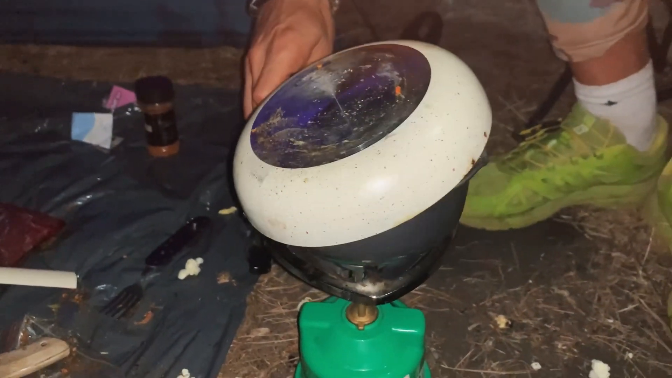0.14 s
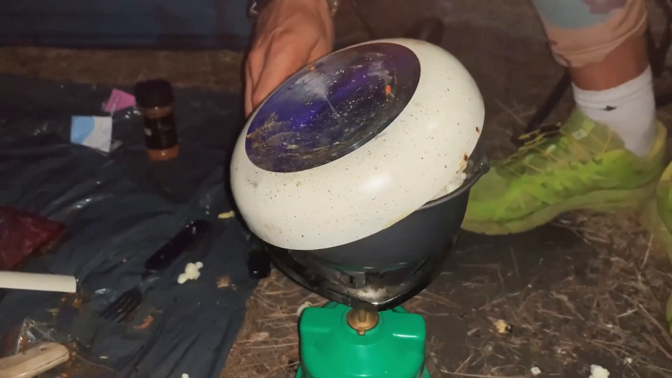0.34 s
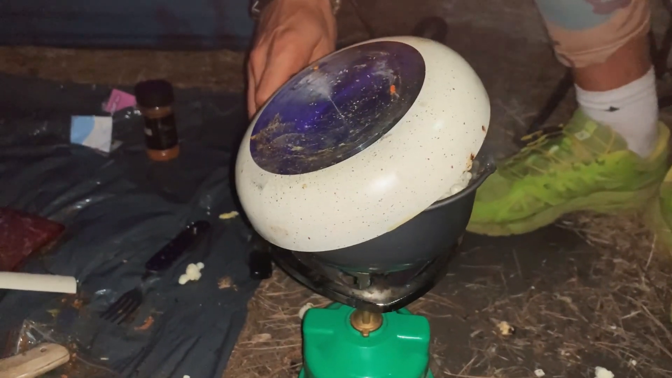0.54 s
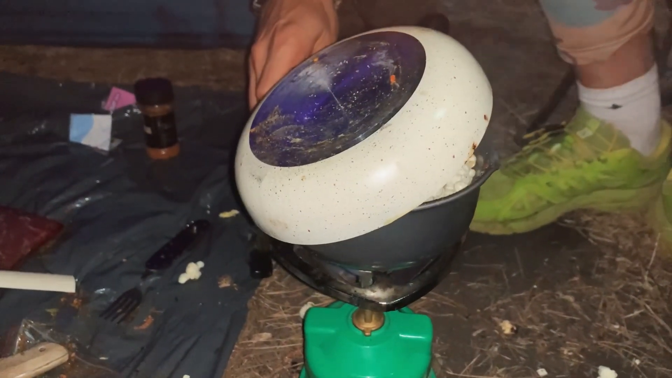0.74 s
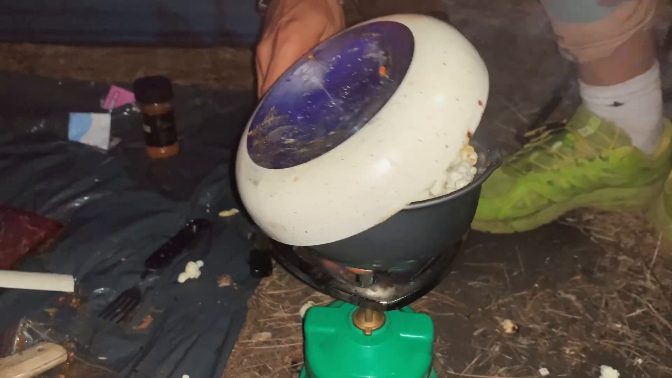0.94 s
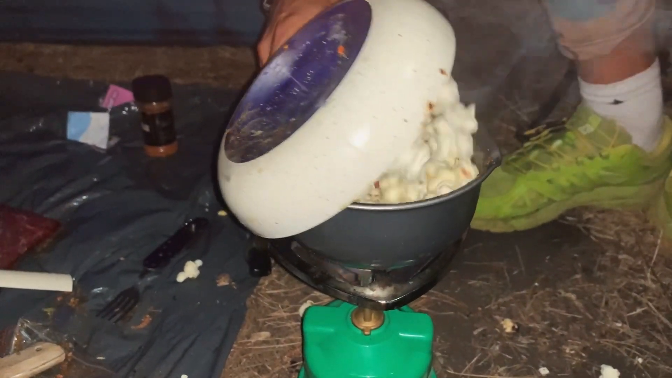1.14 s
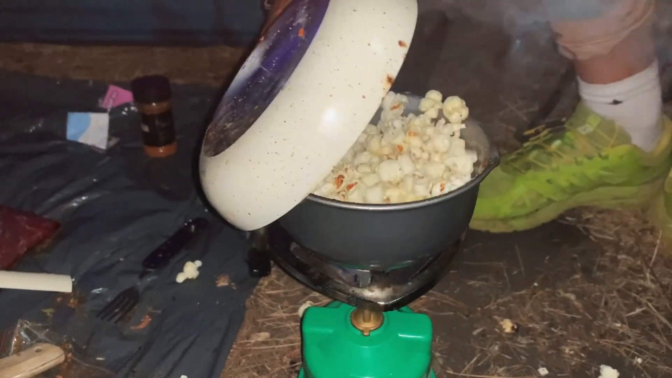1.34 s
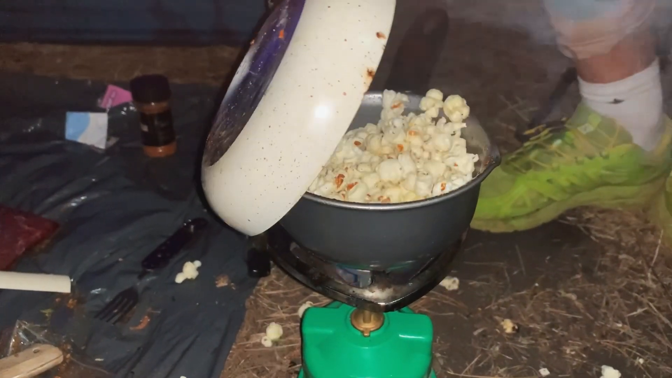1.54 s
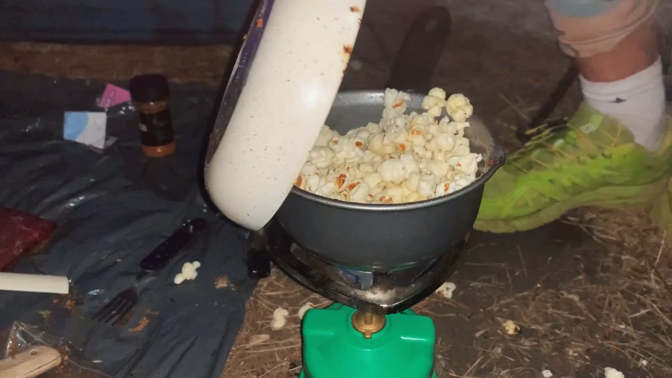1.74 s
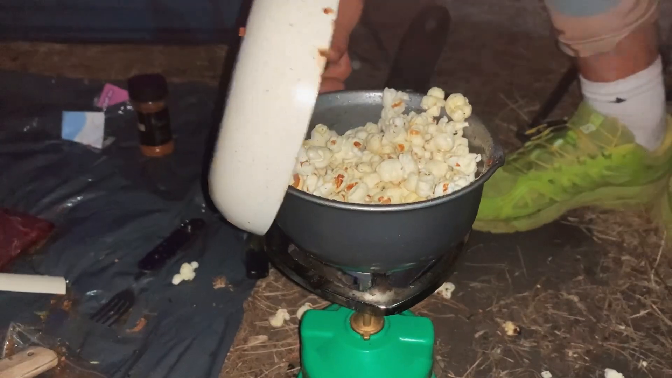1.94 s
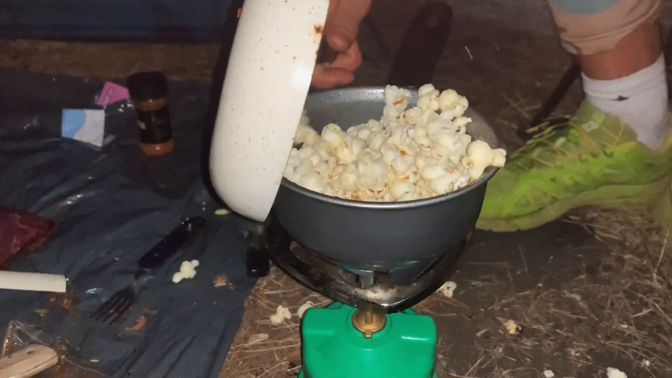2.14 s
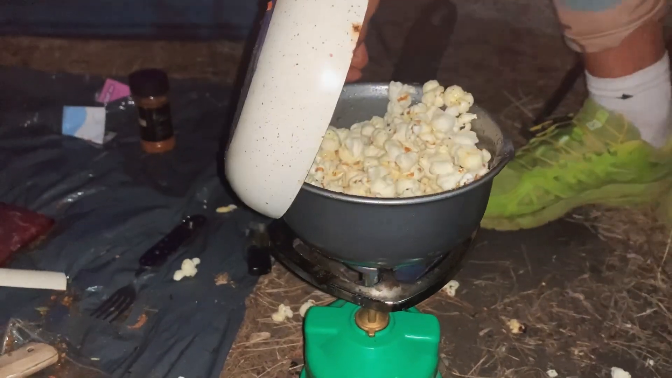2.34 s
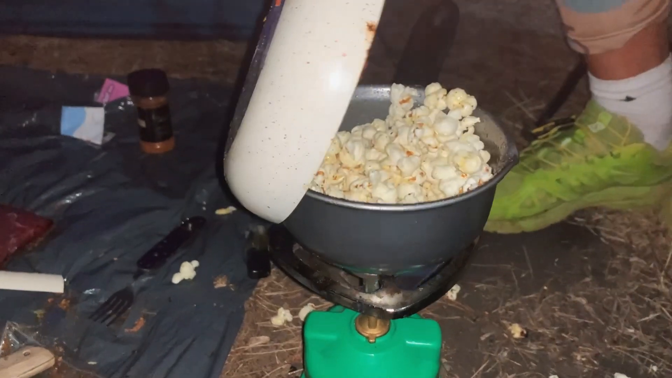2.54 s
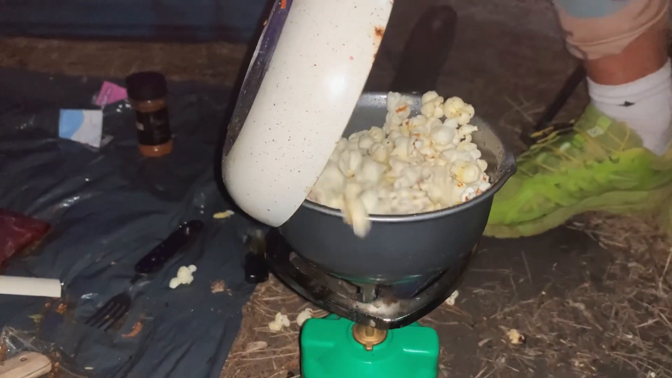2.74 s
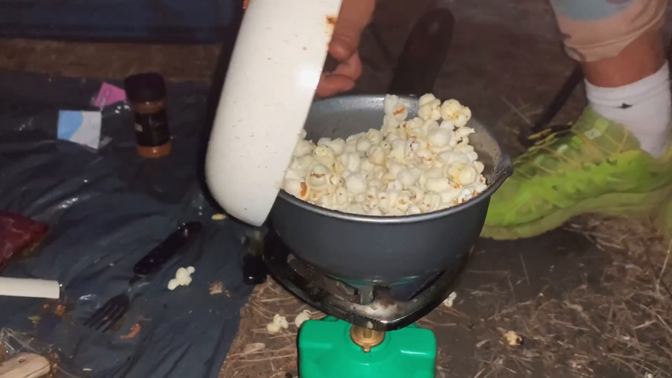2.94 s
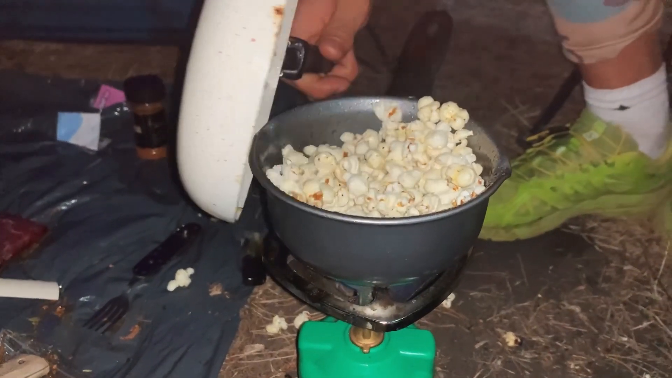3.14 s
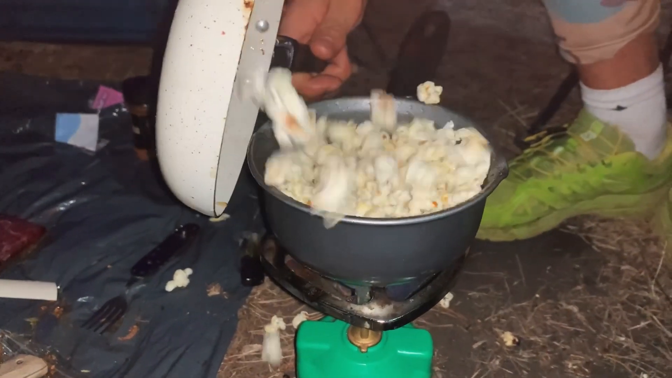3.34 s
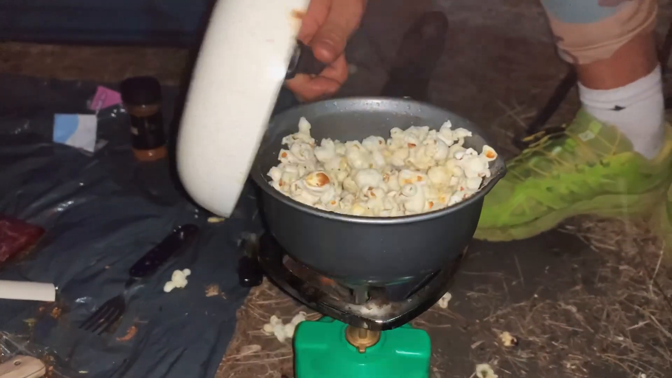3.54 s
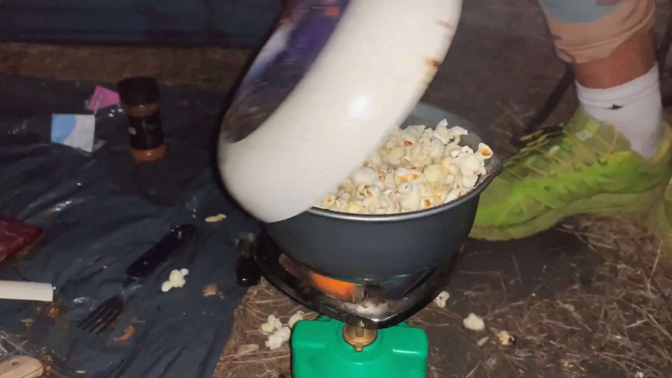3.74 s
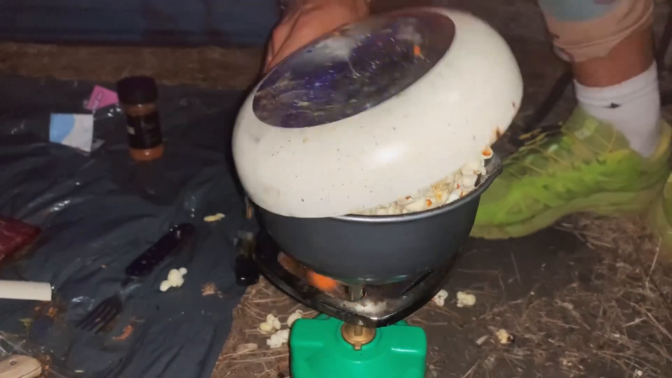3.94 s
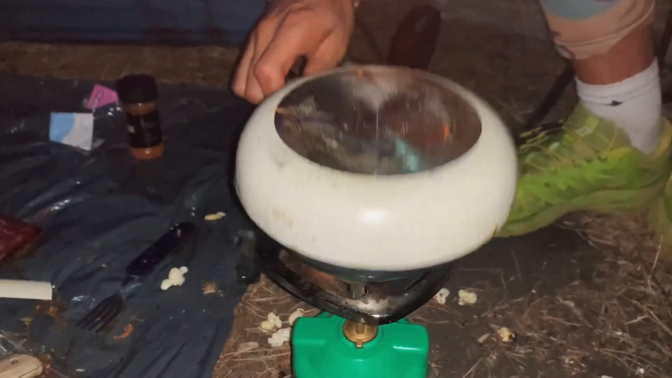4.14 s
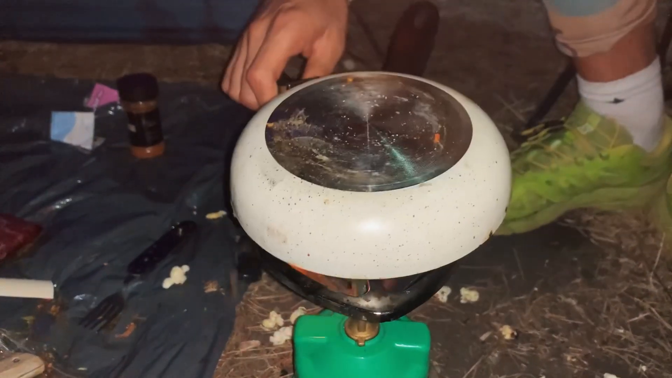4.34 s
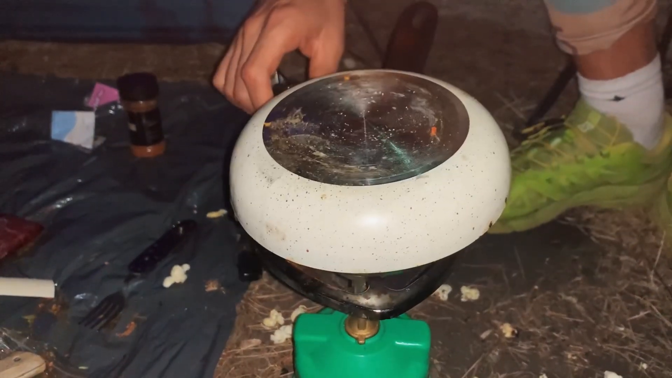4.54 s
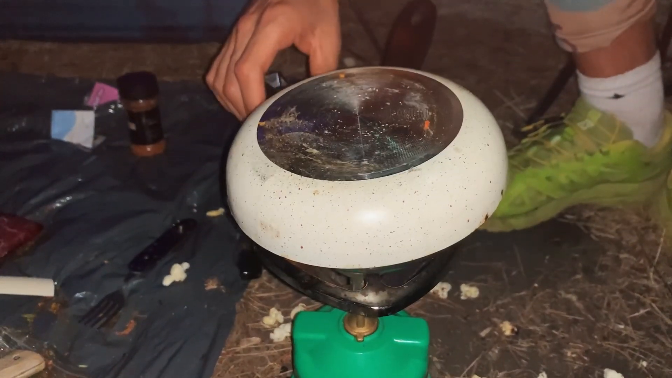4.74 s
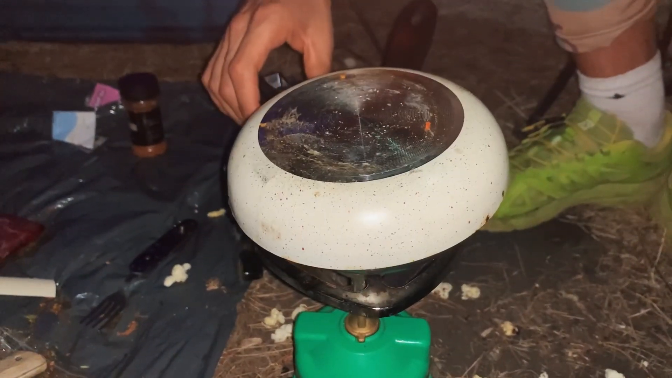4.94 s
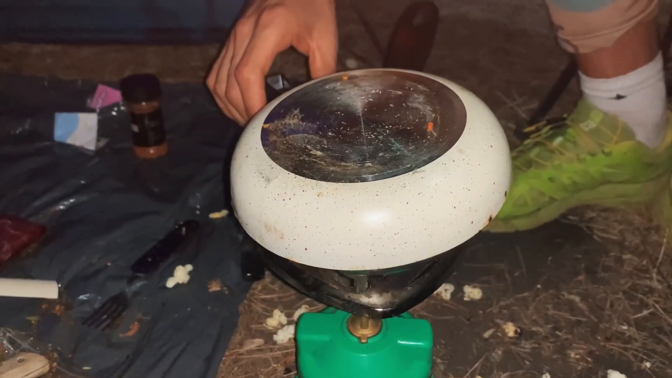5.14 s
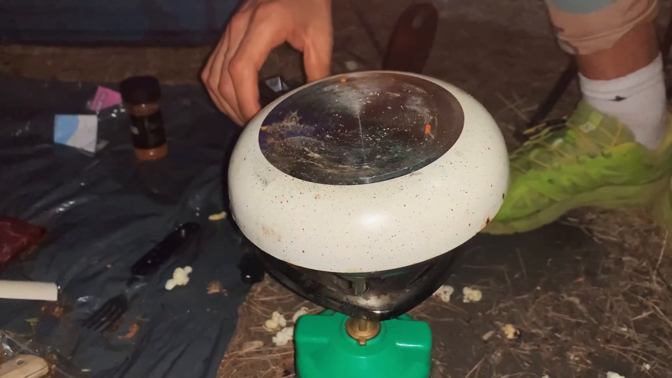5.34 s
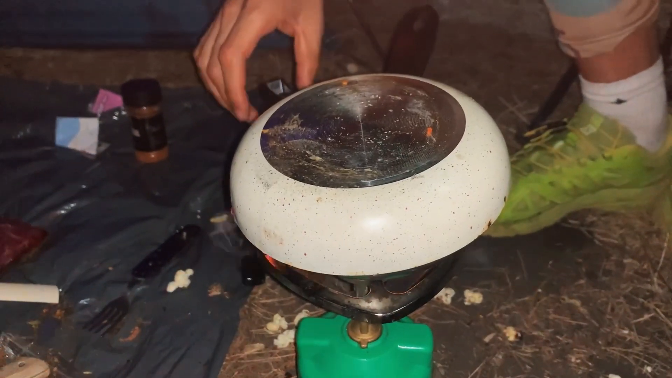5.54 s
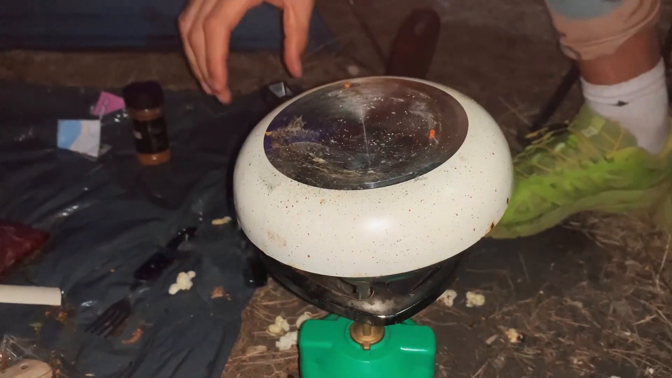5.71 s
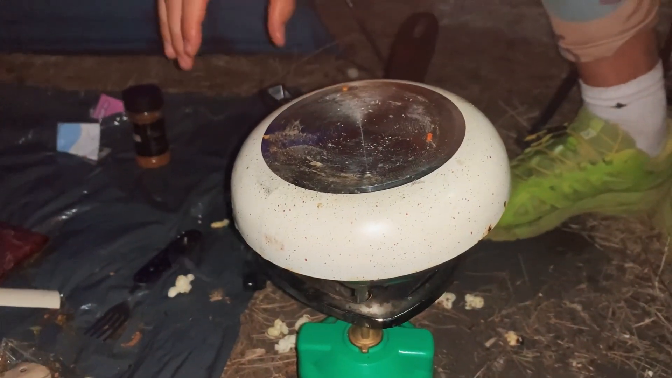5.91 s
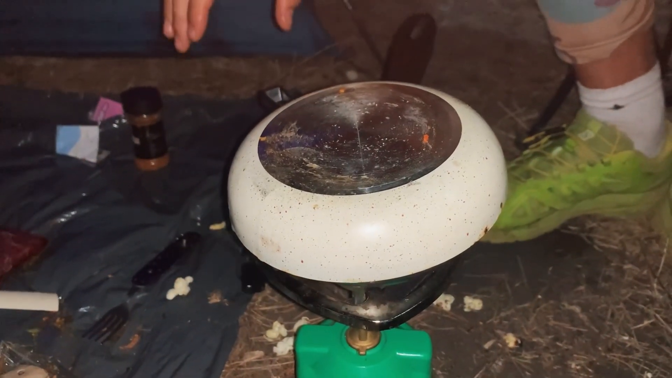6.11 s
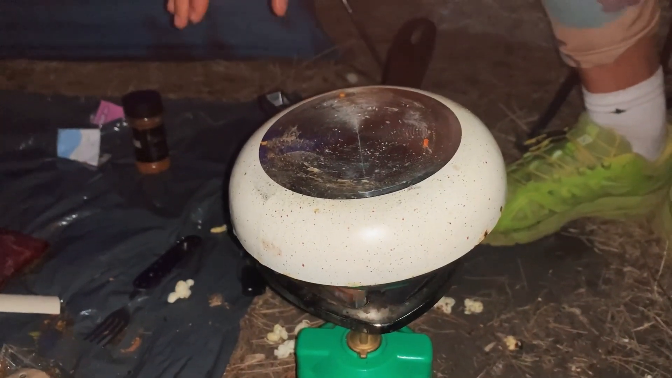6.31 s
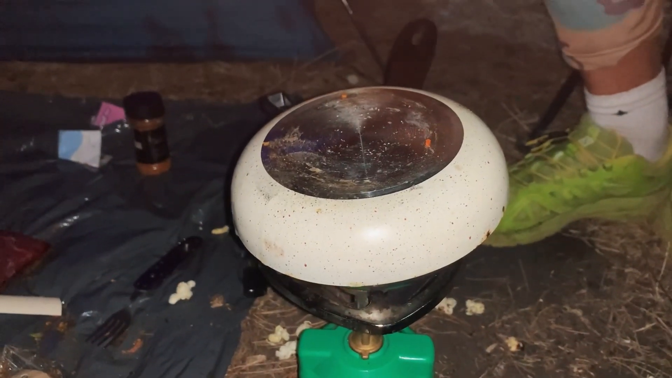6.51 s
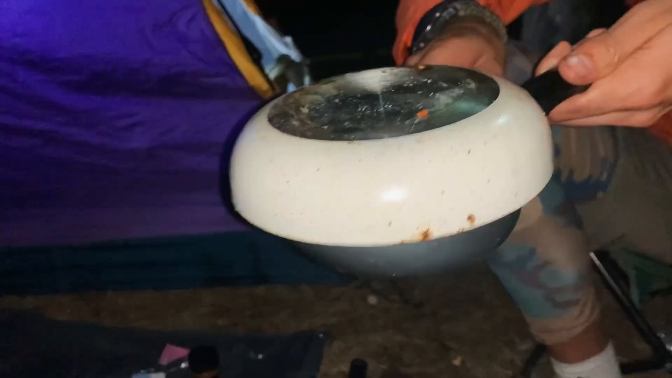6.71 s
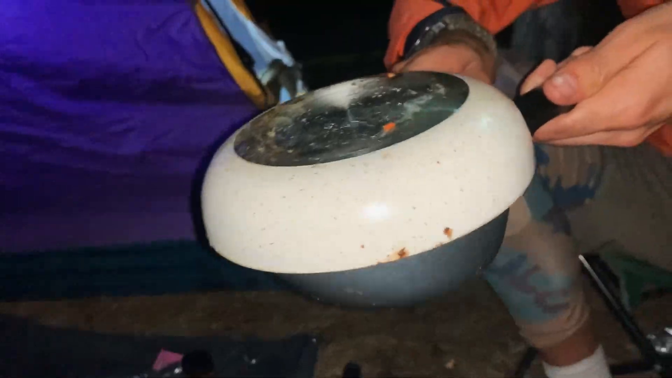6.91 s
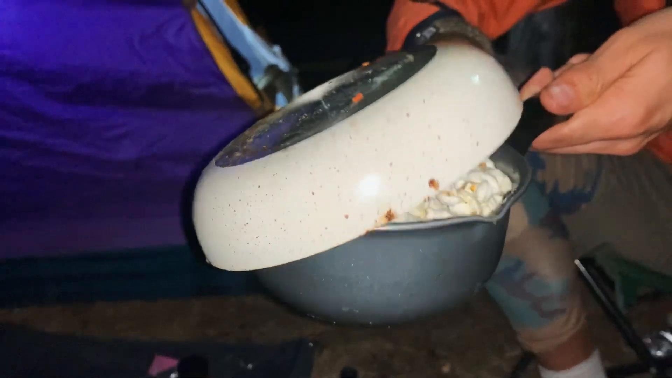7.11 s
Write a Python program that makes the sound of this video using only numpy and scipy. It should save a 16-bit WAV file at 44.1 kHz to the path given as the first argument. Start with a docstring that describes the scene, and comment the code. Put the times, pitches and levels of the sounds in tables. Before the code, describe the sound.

Popcorn snaps and knocks irregularly in a metal pot under a loose bowl lid, over low burner rumble, insect chirps and faint bird whistles, outdoors.

```python
"""Outdoors at night, popcorn bursts in a small metal pot on a gas burner, under an upturned bowl as lid.
The bowl is tilted open, put back and slid off at the end. Each hit is a ragged noise burst with ringing
pot air, a thump, the bowl's modes and a rattling heap. Shaped noise makes the flame's roar, a background hiss
and spitting oil; gliding breathy tones make a far bird, and paired pulses of noise a chirping insect."""
import sys
import numpy as np
from scipy import signal
from scipy.fft import rfft, irfft, next_fast_len
from scipy.io import wavfile
from scipy.ndimage import uniform_filter1d

SR = 44100
rng = np.random.default_rng(int(sys.argv[2]) if len(sys.argv) > 2 else 0)


def generate_wav(signal):
    """Clip the signal to [-1, 1] and save it as 16-bit WAV at the path in sys.argv[1]."""
    frames = np.transpose(np.atleast_2d(signal))
    scaled = np.clip(frames, -1, 1) * 32767
    pcm = np.round(scaled).astype(np.int16)
    wavfile.write(sys.argv[1], SR, pcm)


N = 320590  # samples


def amp(db):
    """Decibels to gain."""
    return 10 ** (np.asarray(db) / 20)


def evened(x, count=None):
    """Scales to rms 1 over the first count samples of the last axis."""
    return x / np.sqrt(np.mean(x[..., :count] ** 2) + 1e-20)


def read(points, hz):
    """A spectrum table read on a log-frequency axis."""
    f, value = np.transpose(points)
    return np.interp(np.log(hz + 1), np.log(f + 1), value)


def track(rows, column=1):
    """One column of a curve at every sample."""
    rows = np.array(rows)
    return np.interp(np.arange(N) / SR, rows[:, 0], rows[:, column])


def add(mix, s, sound):
    """Mixes a sound in at s seconds."""
    part = mix[..., round(s * SR):][..., :sound.shape[-1]]
    part += sound[..., :part.shape[-1]]


def resonate(x, hz, width):
    """A resonance of moving pitch: shifts hz down to zero, smooths, and shifts back."""
    turn = np.exp(2j * np.pi * np.cumsum(hz * np.ones(x.shape[-1])) / SR)
    r = np.exp(-np.pi * width / SR)
    return 2 * (turn * signal.lfilter([1 - r], [1, -r], x / turn)).real


# how alike left and right are, before nearness: (frequency [Hz], likeness [0 to 1])
LIKENESS = [(60, 0.81), (300, 0.98), (700, 0.74), (1500, 0.11), (3000, 0.058), (6800, 0.01), (15000, 0.15)]


def noise(colour, near=0):
    """Two-port noise of rms 1, most alike in the bass; a near point source (1) is more alike."""
    size = next_fast_len(N)
    hz = np.fft.rfftfreq(size, 1 / SR)
    a, b = rfft(rng.standard_normal((2, size)))
    same = np.clip(read(LIKENESS, hz), 0, 1) ** (1 - 0.12 * near)
    pair = np.array([a, same * a + np.sqrt(1 - same ** 2) * b])
    return evened(irfft(pair * amp(read(colour, hz)), size)[:, :N])


def wander(seconds):
    """Smooth chance of rms 1 that changes over the given time."""
    size = max(int(seconds * SR), 1)
    once = uniform_filter1d(rng.standard_normal(N), size)
    return evened(uniform_filter1d(once, size))


def grains(per_s, spread_db, seconds):
    """Envelope of rms 1 made of sparse dying ticks of uneven size."""
    size = amp(spread_db * np.minimum(rng.exponential(1, N), 4))
    ticks = size * (rng.random(N) < per_s / SR)
    return evened(signal.lfilter([1], [1, -np.exp(-1 / (seconds * SR))], ticks))


# background hiss's colour, constant in time: (frequency [Hz], relative level [dB per Hz])
HISS_COLOUR = [(300, 2), (800, -11), (1400, -1.5), (2600, -8.5), (4400, -1.5), (5200, -17.5), (6300, -4.5),
               (7300, -39.5), (8000, 0), (9000, 0.5), (10500, -6.5), (11600, -31.5), (13500, -20),
               (15000, -41.5)]
# background hiss: (time [s], level [dB])
HISS_LEVEL = [(0, -61.5), (1.8, -60), (2.85, -57.5), (3.02, -61.5), (3.55, -56.5), (4.2, -59),
              (4.45, -58.5), (5.2, -62), (5.9, -61), (6.3, -54.5), (6.68, -61.5), (6.85, -70.5)]


def background_hiss():
    """Background hiss, strongest near 8-9 kHz: shaped noise whose level trembles slightly."""
    return amp(track(HISS_LEVEL)) * noise(HISS_COLOUR) * amp(1.0 * wander(0.0033))


# the chirping pace, about ten a second: (time [s], chirps sung so far [count])
CHIRP_COUNT = [(.044, 0), (.548, 5), (.955, 9), (1.475, 14), (2.42, 23), (3.033, 29), (3.65, 35),
               (4.445, 43), (4.84, 47), (5.65, 55), (6.016, 59), (6.716, 66)]
# the insect's level: (time [s], level [dB])
CHIRP_LEVEL = [(0, -58), (2.9, -61.5), (3.1, -75), (3.6, -63), (5.65, -53), (5.8, -78), (6.05, -56.5),
               (6.65, -56.5), (6.76, -59.5)]
# colour of the wing rasp: (frequency [Hz], relative level [dB])
WING_COLOUR = [(7600, -70), (8300, -6), (9050, 0), (9600, -7), (10300, -12.5), (11400, -67)]
STROKE_S, PAIR_GAP_S, SECOND_DB = 0.0032, 0.034, 2.5  # Gaussian sigma; gap and level of the second stroke


def insect():
    """Two short rasping wing strokes per chirp, each a bell-shaped pulse of treble noise."""
    s, sung = np.transpose(CHIRP_COUNT)
    at = np.interp(np.arange(sung[-1] + 1), sung, s)
    size_db = 1.5 * rng.standard_normal((len(at), 2))
    t, strokes = np.arange(-1000, 1000) / SR, np.zeros(N)
    stroke = np.exp(-(t / STROKE_S) ** 2 / 2)
    for centre, (first_db, second_db) in zip(at, size_db):
        add(strokes, centre + t[0], amp(first_db) * stroke)
        add(strokes, centre + PAIR_GAP_S + t[0], amp(second_db + SECOND_DB) * stroke)
    return amp(track(CHIRP_LEVEL)) * strokes * noise(WING_COLOUR, near=0.87)


# far bird's whistles: (start [s], length [s], pitch before scoop and fall [Hz], peak level [dB],
# breath over tone [ratio])
WHISTLES = [(1.266, 0.053, 1396, -52, 3), (1.301, 0.25, 1520, -53.5, 0.44), (1.533, 0.18, 1513, -65, 1.5),
            (3.264, 0.17, 1169, -53, 3.8), (4.39, 0.28, 1542, -53, 0.39)]
SCOOP_HZ, SCOOP_S, WAVER_HZ = 230, 0.018, 8  # slides up from below; waver is rms
FALL_HZ_PER_S = 750  # sinks all along
WHISTLE_PEAK = 0.7  # loudest at this share of the length


def bird():
    """Thin falling whistles, each a gliding sine with narrow breath noise at the same pitch."""
    out = np.zeros((2, N))
    for s, length, top_hz, db, airy in WHISTLES:
        t = np.arange(0, length, 1 / SR)
        glide = top_hz - SCOOP_HZ * np.exp(-t / SCOOP_S) - FALL_HZ_PER_S * t
        hz = glide + WAVER_HZ * wander(0.03)[:len(t)]
        swell_db = np.interp(t / length, [0, WHISTLE_PEAK, 1], [-7, 0, -12])
        phase = np.array([[1.4], [0]])  # left leads by 1.4 radians
        tone = np.sqrt(2) * np.sin(2 * np.pi * np.cumsum(hz) / SR + phase)
        air = rng.standard_normal((2, len(t)))
        breath = evened(resonate(resonate(air, hz, 53), hz, 97))
        whistle = evened(tone + airy * breath)
        add(out, s, amp(db + swell_db) * whistle * signal.windows.tukey(len(t), 0.15))
    return out


# dips of the low roar: (fully down [s], roar starts back [s], flutter starts back [s], depth [dB])
ROAR_DIPS = [(3.051, 3.348, 3.36, -14), (6.814, 7.3, 7.0, -23.5)]
DIP_FALL_S, DIP_RISE_S = 0.11, 0.089


def dips(column):
    """Gain that sinks at each dip and starts back at the time in the given column."""
    depth_db = 0
    for d in ROAR_DIPS:
        down, back, depth = d[0], d[column], d[3]
        curve = [(down - DIP_FALL_S, 0), (down, depth), (back, depth), (back + DIP_RISE_S, 0)]
        depth_db = depth_db + track(curve)
    return amp(depth_db)


# flame roar's colour: (frequency [Hz], relative level [dB per Hz])
ROAR_COLOUR = [(13, -67.5), (22, -41), (43, -9.5), (66, 1.5), (167, -5.5), (281, -21.5), (307, -24.5),
               (422, -34), (509, -53), (700, -64), (910, -90.5), (1540, -120)]
ROAR_DB, FLUTTER_DB = -47.5, -52  # outside the dips


def burner():
    """Lumpy flame roar of bass noise with a narrow flutter near 60 Hz."""
    roar = noise(ROAR_COLOUR) * amp(2.0 * wander(0.024))
    flutter = evened(resonate(rng.standard_normal(N), 62, 4))
    return amp(ROAR_DB) * dips(column=1) * roar + amp(FLUTTER_DB) * dips(column=2) * flutter


# oil spitting and corn rustling in the treble: (time [s], level before the ticks [dB])
SPIT_LEVEL = [(0, -49), (.2, -87), (2.55, -83), (2.75, -62), (3.3, -73.5), (3.45, -53), (3.6, -61.5),
              (3.98, -74), (4.03, -48), (4.14, -59), (4.45, -80.5), (6.0, -87), (6.3, -75), (6.75, -80)]
# colour of the spitting: (frequency [Hz], relative level [dB])
SPIT_COLOUR = [(3000, -29.5), (5000, -10), (6500, -3), (9000, 1), (11000, 1), (11800, -26), (13300, 0.5),
               (15000, -19), (16300, -26.5)]


def spitting():
    """Spitting oil and rustling corn: sparse ticks over a steady bed of treble noise."""
    spits = (0.68 + grains(150, 3.1, 0.0045)) * noise(SPIT_COLOUR)
    return amp(track(SPIT_LEVEL)) * spits


# the bowl's modes: [Hz]
BOWL_HZ = [1160, 1210, 1885, 1960, 2220, 2600, 2738, 3295, 3600, 3984, 4170, 4465, 4750, 5440]
# one row per mode: (relative level [dB], base time to fall 60 dB [s])
BOWL_RING = [(1, 0.12), (-10.5, 0.22), (-1.5, 0.1), (-10.5, 0.15), (-19.5, 0.14), (-10, 0.043), (-14, 0.23),
             (-11.5, 0.13), (-12.5, 0.073), (-2.5, 0.043), (-12, 0.13), (-5, 0.11), (-13, 0.12),
             (-14.5, 0.11)]
RING_SAMPLES = SR // 3


def bowl_ring(share_db=0, lasting=1):
    """The bowl's modes after one tap, quickly damped at first; share_db sets how well each is excited."""
    hz = np.array(BOWL_HZ)[:, None]
    db, t60 = np.transpose(BOWL_RING)[:, :, None]
    t = np.arange(RING_SAMPLES) / SR
    fade = amp(-60 * t / (0.58 * t60)) + amp(-5.0 - 60 * t / (lasting * t60))
    return (amp(db + share_db) * fade * np.sin(2 * np.pi * hz * t)).sum(0)


# corn shuffling, heard mostly while the bowl is moved: (time [s], drive level [dB])
SHUFFLE_LEVEL = [(0, -32), (.14, -65), (.4, -52.5), (.7, -66), (1.3, -61), (1.45, -76.5), (1.95, -76),
                 (2.1, -63.5), (2.8, -60), (3.1, -88), (3.4, -66.5), (3.7, -82), (3.88, -58), (3.95, -51),
                 (4.06, -54), (4.5, -63), (4.65, -55), (4.9, -62.5), (5.0, -110), (5.45, -55),
                 (5.75, -63.5), (5.9, -56), (6.8, -65)]
# the gap under the bowl tunes the pot air and sets how hard corn hits the bowl (slide and hits use it too):
# (time [s], air pitch [Hz], air width [Hz], relative contact [dB], late ring length [factor])
# the ring lasts longer when the bowl is held free
LID = [(0, 740, 190, -15, 5.1), (1.1, 796, 199, -2, 2.4), (1.5, 750, 440, -7.5, 1.7),
       (3.6, 800, 456, -14.5, 3), (4.08, 733, 200, -3, 2.5), (4.15, 532, 82, 15.5, 0.26),
       (4.3, 418, 68, 7, 1.9), (6.6, 426.5, 65, -5.5, 1.56), (6.83, 498, 72, 2.5, 0.84),
       (6.92, 525, 71.3, 9, .9), (7.0, 641, 69.5, 9.5, 0.92), (7.27, 670, 70.6, -6, .9)]
# colour of cracks and dry edges: (frequency [Hz], relative level [dB])
CRACK_COLOUR = [(300, -30), (800, -3), (1500, -0.5), (2300, 3), (3400, 3), (4500, 3.5), (5200, -12.5),
                (6500, -32.5)]


def shuffle():
    """Light knocks of corn heard through the pot air and the bowl, with a dry edge."""
    level = amp(track(SHUFFLE_LEVEL)) * (0.76 + grains(140, 1.8, 0.0034))
    knocks = level * noise([(100, 0.0023), (16000, 0.012)])  # practically white
    hz = track(LID)
    hollow = resonate(resonate(knocks, hz, 160), hz, 360)
    ring = signal.oaconvolve(knocks[0], bowl_ring())[:N]
    return amp(14.5) * hollow + amp(-46.5) * ring + amp(-13.0) * level * noise(CRACK_COLOUR)


# the bowl dragged over the rim: (time [s], drive level [dB])
SLIDE_LEVEL = [(6.81, -72), (6.872, -31.5), (6.93, -42.5), (7.0, -47.5), (7.03, -63), (7.09, -57.5),
               (7.12, -53), (7.2, -54), (7.24, -64.5), (7.27, -42.5)]


def slide():
    """The bowl's gritty scrape over the rim shakes the pot air and, faintly, the bowl."""
    on = track([(6.8, 0), (6.82, 1)])
    rough = (2 + grains(170, 3.1, 0.00764)) / 3
    grit = on * amp(track(SLIDE_LEVEL)) * rough * rng.standard_normal(N)
    hz = track(LID)
    air = resonate(resonate(grit, hz, 105), hz, 180)
    air += amp(-1) * resonate(resonate(grit, 502, 41), 510, 116)  # steady resonances beside the moving one
    air += amp(-24.5) * resonate(grit, 960, 210)
    return amp(23) * air + amp(-53.5) * signal.oaconvolve(grit, bowl_ring())[:N]


# In the next three tables crack is a drive level, and the other levels are relative to it.
# Each also holds some faint short sounds just before a loud hit.
# mostly pops, with dull, low hollow knocks at 2.384 and 3.8757 s:
# (time [s], crack [dB], fizz [dB], pot air [dB], thump [dB], burst decay [ms], hollow [Hz], hollow level [dB])
FULL_HITS = [(0.0241, -23, -6, -11, -23.5, 3.6, 4180, -16), (0.0579, -29, -8.5, -12.5, -27, 1.7, 2300, -19),
             (0.2667, -17.5, -10, -16.5, -15, 4.8, 2310, -9.5),
             (0.273, -11, 1.5, -8, -30.5, 3.8, 2340, -25.5),
             (0.3413, -24.5, -4.5, -5, -12.5, 10.7, 3185, -6),
             (0.8072, -1.5, -13.5, -20.5, -43.5, 4.8, 2220, -20),
             (0.8417, -28.5, 4.5, -11.5, -24, 0.52, 1200, -41),
             (1.1059, -17.5, 0, -8, -8.5, 2.6, 3100, -14.5), (1.9699, -20, -1, -3.5, -9, 8.4, 1414, -11.5),
             (2.384, -37.5, -17, -8.5, -19, 3.9, 490, 1.5), (2.5879, -17.5, 4, -12, -29, 4.2, 2990, -9),
             (2.662, -14, -6.5, -14, -29, 6, 1454, -12.5), (2.9741, -6, -5.5, -23.5, -41, 5, 5100, -19.5),
             (3.1726, -12, -2, -42.5, -48.5, 4.6, 1420, -36), (3.1775, -11, -6, -26, -44, 8, 2160, -12.5),
             (3.1846, -28, 16, -28.5, -13, 0.77, 2160, -10.5), (3.204, -11, -4, -21, -49.5, 5.2, 1335, -22),
             (3.673, -23, -12, -59, -26, 1.9, 1340, -35), (3.8757, -31, -5, -15, -7.5, 2.8, 460, -9.5),
             (4.6644, -18.5, -12, -10, -10.5, 3.3, 4670, -7), (4.722, -24.5, -9, -9.5, -21, 12, 3680, -10),
             (4.7486, -14, -15, -4.5, -11, 5.3, 3430, -11.5),
             (5.3759, -19.5, -21, -35, -22, 3.2, 3540, -13.5),
             (5.522, -14.5, -5.5, -20.5, -17, 6, 4350, -5.5), (5.809, -12, -4.5, -2.5, -9, 3.6, 2655, -11),
             (5.8471, -11, -13, -22, -19.5, 1.1, 3480, -19.5),
             (6.126, -9.5, -7, -8, -17.5, 3.9, 1990, -13.5),
             (6.4356, -15.5, -13.5, -10, -11.5, 4.7, 2490, -18),
             (6.4531, -11, -36, -8.5, -18.5, 1.3, 1080, -21.5)]
# mostly light knocks of corn; a dull one trades fizz for pot air: (time [s], crack [dB], dullness [dB])
KNOCKS = [(0.3506, -28.5, -10), (0.425, -52, 7), (0.467, -39, -3.5), (0.5773, -38.5, -3), (0.658, -35, -6),
          (0.831, -39, 8.5), (0.848, -38, 10.5), (0.904, -52.5, 8), (1.139, -27, -3), (1.157, -34, 3),
          (1.222, -35.5, -4), (2.32, -56, 12), (2.001, -31, 2), (2.016, -35, -3.5), (2.395, -33.5, 1),
          (2.61, -28, -2), (2.7044, -32, -8), (2.7506, -45.5, 6.5), (2.953, -29.5, -8), (3.039, -37, -17.5),
          (3.25, -38, -4), (3.3894, -40, -6), (3.472, -42, -15), (3.4984, -41, -3), (3.811, -44, 13),
          (3.826, -34.5, -2), (3.854, -44, 2), (4.14, -43, -8), (4.198, -40.5, 7), (4.2164, -39, 10.5),
          (4.071, -36.5, -16.5), (4.1275, -32.5, -14), (4.255, -38.5, -17.5), (4.2645, -29.5, -3),
          (4.3093, -34, -8), (4.4047, -44, 19), (4.4247, -42.5, 12.5), (4.7833, -32.5, 1), (4.815, -37, -3),
          (4.86, -41, -5), (5.395, -37, -5), (5.4201, -34, -2.5), (5.5805, -39, -3), (5.8762, -32, -0.5),
          (5.8993, -41.5, 6.5), (6.15, -53, 18), (6.7307, -56.5, 15.5)]
# mostly clanks of the bowl: (time [s], crack [dB], pot air [dB], bowl ring [dB], favoured pitch [Hz])
CLANKS = [(0.283, -37, -4, 23, 1610), (0.862, -50, -4, 22, 1300), (1.111, -37, -2, 13, 1520),
          (2.2949, -52.5, 3, 27, 1250), (2.298, -49.5, -10, 22.5, 2500), (3.7948, -25, -6, 15.5, 2680),
          (4.1672, -27, 5.5, -16, 1210), (4.174, -13.5, 0, -4, 2200), (4.186, -36.5, -9.5, 16.5, 2020),
          (4.222, -36.5, 8.5, 10.5, 2000), (4.6972, -36, -11, 5.5, 1210), (5.529, -37.5, 1.5, 5, 1160),
          (5.8191, -29, 3.5, 18, 1690), (5.849, -35, -10, 13, 2740), (6.132, -46, 15, 10, 1950),
          (6.163, -46.5, 1, 14, 2000), (6.185, -49, -4, 13, 1960), (6.4525, -29, -31, 22.5, 1720),
          (6.478, -26, -9.5, 8.5, 4400), (6.7101, -55, 4, 12, 1890), (6.872, -48, 3, 3, 1890)]
# the hollow for every knock: (centre [Hz], level relative to crack [dB], spread either way [octaves])
KNOCK_HOLLOW = (3400, -34.5, 0.17)
FULL_RING_DB, HOLLOW_OCTAVES = -19, 0.1  # octaves: spread of the hollow either way, for clanks too
KNOCK_FIZZ_DB, KNOCK_AIR_DB = -15, -8.5  # at dullness 0
KNOCK_THUMP_DB, KNOCK_RING_DB, KNOCK_MS = -26, -8.5, 4.3
CLANK_HOLLOW_DB, CLANK_FIZZ_DB, CLANK_THUMP_DB, CLANK_MS = -11.5, -8.5, -25, 3.8


def hit_rows():
    """All hits as rows of (s, crack dB, fizz, pot air, thump, ring dB, burst ms, hollow)."""
    rows = []
    for s, db, fizz, air, thump, ms, hz, level in FULL_HITS:
        rows.append((s, db, fizz, air, thump, FULL_RING_DB, ms, (hz, level, HOLLOW_OCTAVES)))
    for s, db, dull in KNOCKS:
        fizz, air = KNOCK_FIZZ_DB - dull, KNOCK_AIR_DB + dull
        rows.append((s, db, fizz, air, KNOCK_THUMP_DB, KNOCK_RING_DB, KNOCK_MS, KNOCK_HOLLOW))
    for s, db, air, ring, hz in CLANKS:
        hollow = (hz, CLANK_HOLLOW_DB, HOLLOW_OCTAVES)
        rows.append((s, db, CLANK_FIZZ_DB, air, CLANK_THUMP_DB, ring, CLANK_MS, hollow))
    return rows


def heap_hollow(gap, force, t):
    """Gaps in the heap give each hit its own brief colour: six damped resonances around one pitch."""
    centre_hz, _, octaves = gap
    hz = centre_hz * 2 ** (octaves * (2 * rng.random((6, 1)) - 1))
    colour = (np.sin(2 * np.pi * hz * t) * amp(-60 * t / 0.033)).sum(0)
    return evened(signal.oaconvolve(colour, force), count=400)


def pot_air(force, t, hz, width):
    """A sudden jolt and ragged noise set the air under the bowl resonating."""
    jolt = np.exp(-t / 0.003) + 1.4 * force
    return evened(resonate(resonate(jolt, hz, width), hz, 1300), count=400)


def low_thump(t):
    """A short sine whose pitch drops from 360 towards 100 Hz."""
    hz = 100 + 260 * np.exp(-t / 0.0053)
    thump = t / 0.003 * np.exp(-t / 0.006) * np.sin(2 * np.pi * np.cumsum(hz) / SR)
    return evened(thump, count=600)


# colour of the fizz: (frequency [Hz], relative level [dB])
FIZZ_COLOUR = [(4000, -51.5), (5200, -13), (6200, 0.5), (7400, -13), (8300, 3), (10200, -7), (11700, -18.5),
               (13500, -14.5), (15500, -42.5)]
HEAP_DB, HEAP_T60, HEAP_PER_S = -32, 0.3, 680  # heap rattle: dB re crack; s, before a fade-out; ticks
HEAP_SPREAD_DB = 8  # scale of the uneven tick sizes
FAVOUR_DB_PER_OCTAVE = -11  # modes far from the favoured pitch ring less
CHATTER_DB, CHATTER_S = 2.5, 0.0038  # the bowl sits loosely, so each mode stutters; dB is rms


def hits():
    """Each hit: crack and fizz in a ragged burst, pot air, thump, bowl ring and the heap settling."""
    t, lead = np.arange(4096) / SR, np.arange(-800, 0) / SR
    crack, fizz, heap, low, ring = np.zeros((5, N))
    modes_hz = np.array(BOWL_HZ)[:, None]
    chatter = np.array([np.pad(wander(CHATTER_S), (0, RING_SAMPLES)) for _ in BOWL_HZ])
    chatter_db = CHATTER_DB * chatter
    for s, db, fizz_db, air_db, thump_db, ring_db, ms, gap in hit_rows():
        burst = (1 - np.exp(-t / 0.00045)) * np.exp(-1000 * t / max(ms, 0.3))
        swell = amp(-16.0) * np.exp(lead / 0.0045)  # the sound swells for a few ms before the burst
        whole = np.append(swell, burst + swell[-1] * np.exp(-t / 0.002))
        add(crack, s + lead[0], amp(db - 6.5) * whole)
        add(fizz, s + lead[0], amp(db + fizz_db) * whole)
        fade_out = np.hanning(2 * len(t))[len(t):]
        add(heap, s, amp(db + HEAP_DB - 60 * t / HEAP_T60) * fade_out)

        lid_now = [np.interp(s, *np.transpose(LID)[[0, k]]) for k in range(1, len(LID[0]))]
        air_hz, air_width, contact_db, lasting = lid_now
        spot_db = 2.7 * rng.standard_normal((len(BOWL_HZ), 1))  # each hit excites the modes unevenly
        favour_db = FAVOUR_DB_PER_OCTAVE * abs(np.log2(modes_hz / gap[0]))
        stutter_db = chatter_db[:, round(s * SR):][:, :RING_SAMPLES]
        struck = evened(bowl_ring(spot_db + favour_db + stutter_db, lasting), count=800)
        add(ring, s + 0.002, amp(db + ring_db + contact_db - 15.5) * struck)

        force = rng.standard_normal(len(t)) * burst
        add(low, s, amp(db + gap[1]) * heap_hollow(gap, force[:800], t[:1200]))
        add(low, s, amp(db + air_db) * pot_air(force, t, air_hz, air_width))
        add(low, s, amp(db + thump_db) * low_thump(t))
    # each burst is finely ragged
    ragged = evened(amp(2.97 * np.clip(wander(0.00024), -2, 2)))
    rattle = heap * (0.5 + grains(HEAP_PER_S, HEAP_SPREAD_DB, 0.00067))
    snap = (crack + rattle) * noise(CRACK_COLOUR, near=0.39)
    snap += (fizz + 0.5 * rattle) * noise(FIZZ_COLOUR, near=0.41)
    # the bursts and the rattling heap keep the bowl sounding
    contact = amp(track(LID, column=3)) * ragged * snap[0]
    clatter = signal.oaconvolve(contact, bowl_ring())[:N]
    return ragged * snap + low + amp(-49.5) * clatter + ring


def scene():
    """All sources at the two ports, from the background to the hits."""
    background = background_hiss() + insect() + bird() + burner()
    return background + spitting() + shuffle() + slide() + hits()


# right port over left: (frequency [Hz], level difference [dB])
RIGHT_OVER_LEFT = [(100, 0), (600, 3), (1200, -1), (4000, 2), (7000, 1), (8100, 12), (9500, 9),
                   (12000, -0.5)]
RIGHT_LAG = 4  # samples, reached at 5 kHz; half of it in the deepest bass
EDGE_HZ = 16400


def record(dry):
    """The right port hears a little later and peaks near 8 kHz; peaks saturate softly; then the band limit."""
    size = next_fast_len(N + 1024)
    hz = np.fft.rfftfreq(size, 1 / SR)
    tilt = amp(read(RIGHT_OVER_LEFT, hz) / 2)
    lag = RIGHT_LAG * np.clip(0.5 + hz / 10000, 0, 1)  # the case delays short waves most
    ports = np.array([1 / tilt, tilt * np.exp(-2j * np.pi * hz * lag / SR)])
    heard = irfft(rfft(dry, size) * ports, size)[:, :N]
    soft = 0.9 * heard / (0.9 ** 4 + heard ** 4) ** 0.25  # levels off at 0.9
    band = signal.firwin(511, EDGE_HZ, window=("kaiser", 9), fs=SR)
    return signal.oaconvolve(soft, band[None], "same")


dry = scene()
out = record(dry)
generate_wav(out)
```